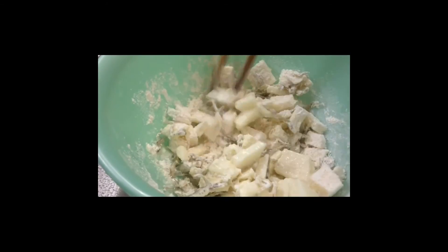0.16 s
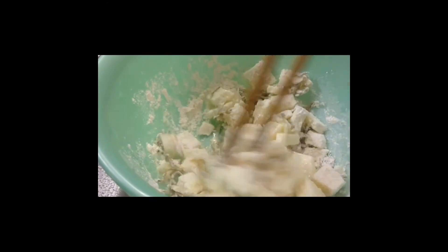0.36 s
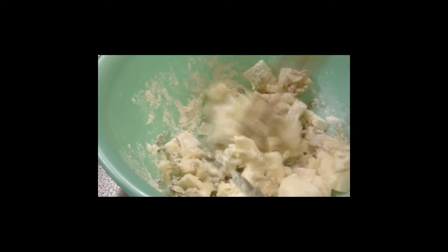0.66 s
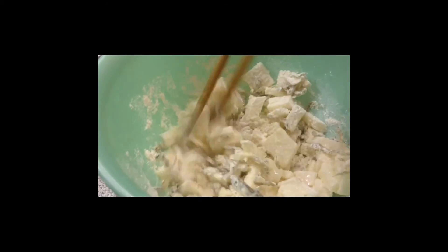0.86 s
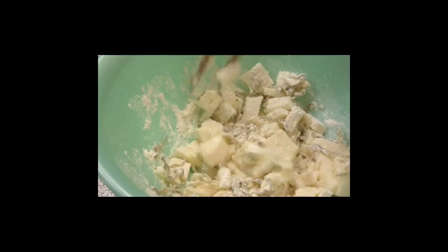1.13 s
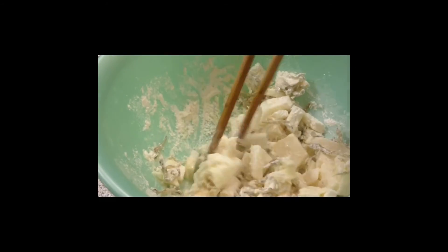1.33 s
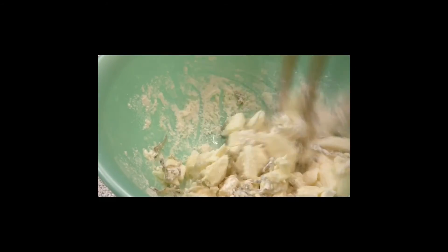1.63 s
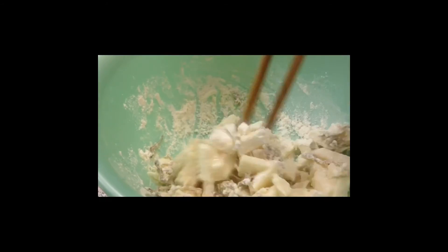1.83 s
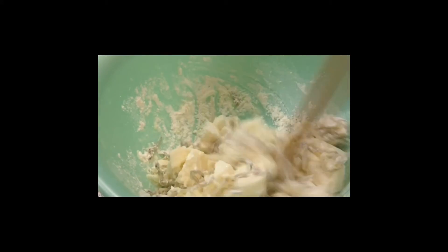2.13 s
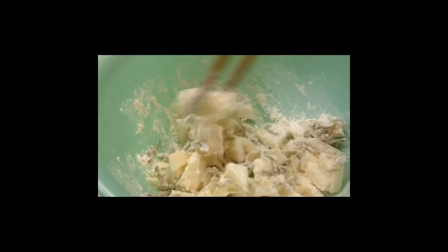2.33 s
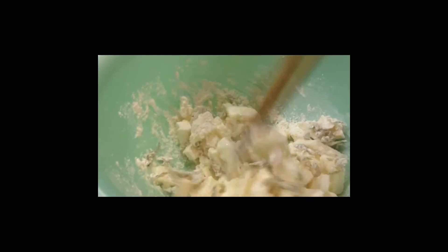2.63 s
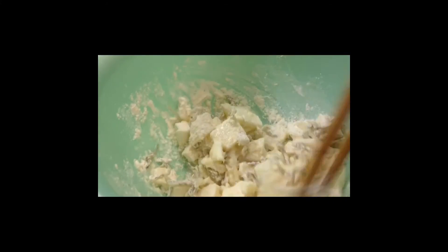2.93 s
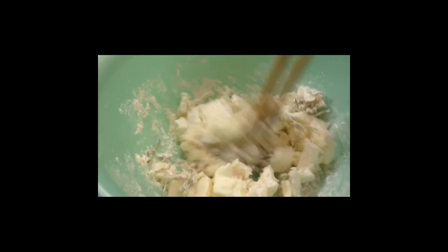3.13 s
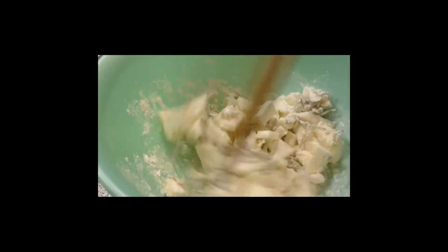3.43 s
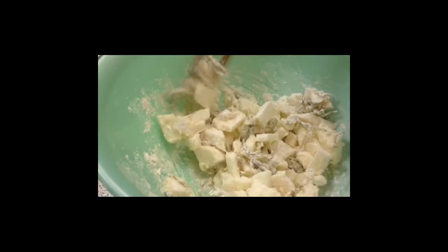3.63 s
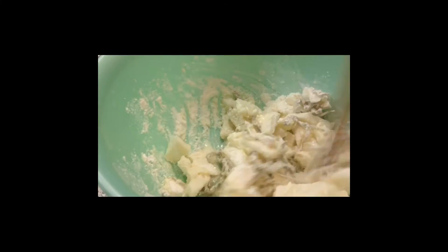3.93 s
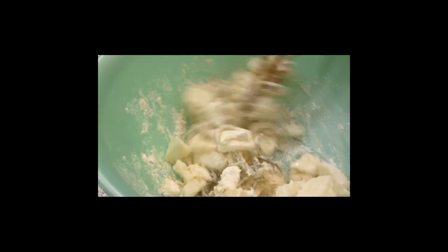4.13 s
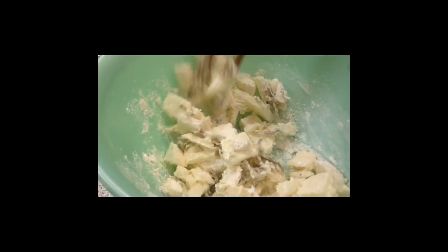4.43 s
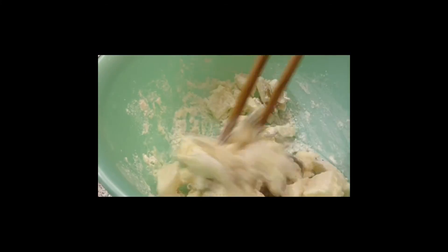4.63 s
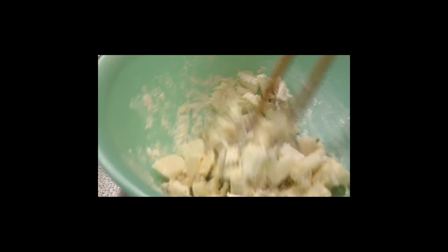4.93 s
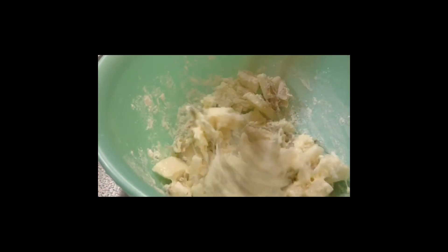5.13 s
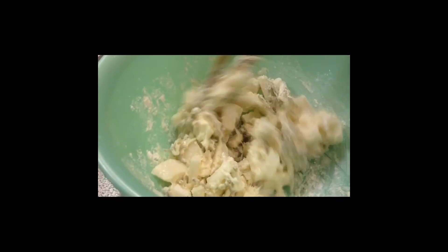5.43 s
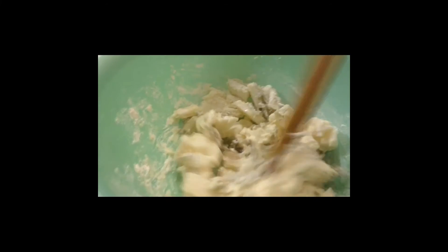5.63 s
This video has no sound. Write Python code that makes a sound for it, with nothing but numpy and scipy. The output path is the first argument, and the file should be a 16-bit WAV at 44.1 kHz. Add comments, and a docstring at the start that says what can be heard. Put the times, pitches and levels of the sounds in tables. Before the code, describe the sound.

In a quiet kitchen, a lumpy, floury mix is stirred briskly and unevenly for about six seconds, heard from close by. Each stroke drags along the plastic bowl with a brief scrape and a fine dry hiss. The wooden chopsticks tick against each other, once sharply past the middle, while sticks and tumbling lumps thud softly on the bowl. A faint low room hum lies underneath.

```python
"""Chopsticks stirring stiff batter

Two wooden chopsticks toss floury chunks in a plastic bowl, close by in a quiet kitchen.
Each stroke drags the gritty mix along the wall, and stick-slip friction makes it scrape.
Knocking sticks and tumbling lumps excite the bowl's low modes as dull thuds; the sticks
click together and ring in their bending modes. Short echoes and a steady hush surround them."""
import sys
import numpy as np
from scipy import signal
from scipy.fft import rfft, irfft, next_fast_len
from scipy.io import wavfile
from scipy.ndimage import uniform_filter1d

SR = 44100
rng = np.random.default_rng(int(sys.argv[2]) if len(sys.argv) > 2 else 0)


def transcribe(signal):
    """Save signal, clipped to [-1, 1], as a 16-bit WAV file at the path in sys.argv[1]."""
    frames = np.atleast_2d(signal).T
    limited = np.clip(frames, -1, 1)
    pcm = np.round(limited * 32767).astype(np.int16)
    wavfile.write(sys.argv[1], SR, pcm)


N = 254898


def amp(db):
    """Amplitude ratio of a level: a factor of ten per 20 dB."""
    return 10 ** (np.asarray(db) / 20)


def unit_rms(x):
    """Normalisation to unit mean power."""
    return x / np.sqrt(np.mean(x ** 2) + 1e-20)


def curve_at(points, hz):
    """Interpolation of (f/Hz, value) points on a logarithmic frequency axis."""
    f, value = np.transpose(points)
    return np.interp(np.log(hz + 1), np.log(f + 1), value)


def add(mix, start_s, sound):
    """Superposition of a sound on the mix."""
    part = mix[round(start_s * SR):][:len(sound)]
    part += sound[:len(part)]


def band(x, low_hz, high_hz):
    """Causal band-pass filtering with skirts of 12 dB per octave."""
    edges_hz = [low_hz, min(high_hz, 0.45 * SR)]
    return signal.sosfilt(signal.butter(2, edges_hz, "band", fs=SR, output="sos"), x)


def coloured(x, spectrum):
    """Spectral shaping by a curve of (f/Hz, level/dB), at unit rms."""
    size = next_fast_len(len(x))
    gain = amp(curve_at(spectrum, np.fft.rfftfreq(size, 1 / SR)))
    return unit_rms(irfft(rfft(x, size) * gain, size)[:len(x)])


def room_hush(air_db=-57.5, drone_db=-55.0, whine_db=-72.5):
    """Stationary noise: a broad hush, a low blurred drone and a faint narrow-band whine."""
    # spectra of the hush and the drone: f/Hz, relative level/dB
    air_spectrum = [(25, -42), (60, -29), (110, -7), (160, 3), (260, -10), (450, -3), (750, -11.5),
                    (1200, -12.5), (2200, -19), (4000, -21), (7000, -22.5), (10500, -28.5), (15500, -30)]
    drone_spectrum = [(90, -17.5), (140, -12), (172, 5), (210, -5.0), (255, 1.5), (310, -6.5),
                      (440, -10.5), (600, -15.0), (1200, -78)]
    whine = amp(whine_db) * unit_rms(band(rng.standard_normal(N), low_hz=2130, high_hz=2280))
    air = amp(air_db) * coloured(rng.standard_normal(N), air_spectrum)
    drone = amp(drone_db) * coloured(rng.standard_normal(N), drone_spectrum)
    return air + whine + drone


def stroke_levels(bite_s=0.007, lift_db_per_s=275, settle_db=-11.5, settle_db_per_s=96):
    """Friction envelopes of drag and dry flour in dB: the sticks bite, heap up the mix and lift."""
    # pushes: t/s, duration/s, final level/dB, swell up to it/dB, flour re drag at mid-push/dB
    strokes = [(0.111, 0.11, -45.5, 2, -5.5), (0.322, 0.072, -58.5, 2, -11), (0.421, 0.16, -47.5, 11, -9.5),
               (0.829, 0.032, -41.5, 8.5, -8), (1.133, 0.12, -48, 3, -12), (1.297, 0.014, -55, -8, -6),
               (1.462, 0.22, -42, 12, -10), (2.01, 0.13, -44.5, 6.5, -8.5), (2.398, 0.02, -41.5, 18, -4.5),
               (2.479, 0.03, -51, -1, -10), (2.744, 0.11, -54.5, 3, -8), (2.879, 0.067, -39, 16.5, -10.5),
               (2.983, 0.023, -45.5, 8, -19), (3.264, 0.13, -52, -2.5, -10),
               (3.591, 0.054, -42, 14.5, -9.5), (3.716, 0.13, -58.5, -2.5, -9),
               (3.901, 0.16, -41, 13.5, -8.5), (4.335, 0.071, -39.5, 16, -18), (4.427, 0.03, -49.5, 9, -3),
               (4.525, 0.058, -52, 2.5, -11), (4.718, 0.17, -51, 10, -6.5), (5.101, 0.19, -51.5, 1, -11.5),
               (5.369, 0.059, -40.5, 23, -7.5), (5.479, 0.083, -47, 5.5, -10),
               (5.75, 0.035, -39.5, 11, -10.5)]
    flour_fade_db = 7.5  # dry flour is met first, damp dough deeper in
    drag_power, flour_power = np.full((2, N), 1e-10)
    t = np.arange(SR * 3 // 4) / SR
    for start_s, length_s, level_db, swell_db, flour_db in strokes:
        depth = np.minimum(t / length_s, 1)
        after_s = np.maximum(t - length_s, 0)
        settling = amp(settle_db - settle_db_per_s * after_s)  # loose lumps keep sliding
        release = (amp(-lift_db_per_s * after_s) + settling) / (1 + amp(settle_db))
        push = np.minimum(t / bite_s, 1) * amp(level_db - swell_db * (1 - depth)) * release
        flour = push * amp(flour_db - flour_fade_db * (depth - 0.5))
        add(drag_power, start_s, push ** 2)
        add(flour_power, start_s, flour ** 2)
    return 10 * np.log10(drag_power), 10 * np.log10(flour_power)


def wander(hz):
    """Random modulation at unit rms, interpolated between hz new values a second."""
    steps = rng.standard_normal(N // 20)
    return unit_rms(np.interp(np.arange(N) * hz / SR, np.arange(len(steps)), steps))


def slips(per_s, spread_db):
    """Shot noise: tiny slips at random moments, most small and a few large."""
    size = amp(spread_db * np.minimum(rng.exponential(1, N), 4))
    return unit_rms(size * rng.standard_normal(N) * (rng.random(N) < per_s / SR))


def patchy(x, depth_db):
    """Spectral modulation: lumps of many sizes pass, each briefly favouring its own frequencies."""
    spectra = signal.stft(x, nperseg=256)[2]
    patches = uniform_filter1d(rng.standard_normal(spectra.shape), size=7, axis=0)
    patches = unit_rms(uniform_filter1d(patches, size=6, axis=1))
    return unit_rms(signal.istft(spectra * amp(depth_db * patches), nperseg=256)[1][:len(x)])


def bowl_ring(detune=0.024, spread_db=1.5):
    """Modal impulse response of the bowl; contact point and batter load shift the modes."""
    # bowl modes: f/Hz, level/dB, T60/s
    modes = [(114.7, -10.5, 0.3), (155.4, -2, 0.138), (176.2, 3, 0.083), (253.4, 1.5, 0.12),
             (331, -5, 0.077), (433.4, -8.5, 0.11), (509, -4.5, 0.036), (680, 0, 0.03), (789, -15, 0.1),
             (847, 1, 0.02), (930, -11.5, .03), (1172, -1, 0.015), (1450, -10, 0.041), (1580, 5, 0.023),
             (1970, -27, 0.026), (2090, 12.5, 0.0082), (2570, -1.5, 0.096)]
    hz, db, t60 = np.transpose(modes)[:, :, None]
    shift, weight = rng.standard_normal((2, len(modes), 1))
    t = np.arange(SR // 4) / SR
    decay = amp(db + spread_db * weight - 60 * t / t60)
    return (decay * np.cos(2 * np.pi * hz * (1 + detune * shift) * t)).sum(0)


def batter_scrape(body_db=0.87, grit_db=-0.5, snaps_db=-14.0, crumbs_db=-58.5, rumble_db=-22.5):
    """Stick-slip friction: floury lumps slide on plastic and drive the bowl's modes into a rumble."""
    # spectra of sliding lumps, dry flour and crumbs: f/Hz, relative level/dB
    lump_spectrum = [(300, -13), (700, -4), (1150, -12), (1600, -1.5), (1900, -6), (2450, 1), (3200, -1),
                     (4200, 1), (5200, -3.5), (7200, -2.5), (9000, -11.5), (10500, -31), (15500, -19)]
    flour_spectrum = [(3000, -45), (6000, -9), (8500, 17.5), (11000, 13), (14000, 12.5), (16000, 0)]
    crumb_spectrum = [(1500, -14), (3500, 0), (7000, 12.5), (10000, 2), (15000, 4)]
    catching_db = 1.5 * wander(hz=110.7) + 0.5 * wander(hz=35.15)  # the mix catches and lets go
    drag_db, flour_db = np.array(stroke_levels()) + catching_db
    coarse, fine = slips(per_s=11000, spread_db=2), slips(per_s=11000, spread_db=1.5)
    sparse, heavy = slips(per_s=60, spread_db=3), slips(per_s=2500, spread_db=1.5)
    body = amp(drag_db + body_db) * patchy(coloured(coarse, lump_spectrum), depth_db=2)
    grit = amp(flour_db + grit_db) * patchy(coloured(fine, flour_spectrum), depth_db=4.5)
    # crumbs keep dropping and unsticking even between the strokes
    crumbs = amp(0.14 * drag_db + crumbs_db) * patchy(coloured(sparse, crumb_spectrum), depth_db=7)
    wall_force = band(heavy, low_hz=135, high_hz=1490)
    rumble = amp(0.65 * drag_db + rumble_db) * unit_rms(signal.oaconvolve(wall_force, bowl_ring())[:N])
    breaks = slips(per_s=150, spread_db=3.5)  # lumps break and bump
    snaps = amp(drag_db + snaps_db) * patchy(coloured(breaks, lump_spectrum), depth_db=6)
    return body + grit + snaps + crumbs + rumble


def bowl_knocks(judder=2.67, slips_per_s=2000):
    """Impact excitation of the bowl: one blow, then a judder as sticks and lumps skid to rest."""
    # heavy blows reach low, hard ones high: t/s, level/dB, low f/Hz, high f/Hz, judder decay time/s
    blows = [(0.112, -42, 145, 1400, 0.097), (0.152, -44, 131, 400, 0.026), (0.4560, -46.5, 130, 487, 0.05),
             (0.524, -46, 140, 710, 0.079), (0.8520, -34, 184, 620, 0.014), (0.866, -34, 170, 810, 0.037),
             (1.1301, -43.5, 292, 1180, 0.0048), (1.25, -48, 140, 400, 0.0033),
             (1.4702, -34, 160, 1370, 0.0043), (1.5060, -47.5, 139, 278, 0.053),
             (1.9880, -38, 1120, 1830, 0.014), (2.006, -38.5, 517, 1700, 0.0055),
             (2.1200, -47.5, 570, 960, 0.014), (2.4230, -42.5, 250, 1460, 0.032),
             (2.4420, -39.5, 208, 860, 0.011), (3.264, -42, 195, 990, 0.091),
             (3.289, -40, 266, 890, 0.0081), (3.3055, -34, 303, 960, 0.012), (3.4438, -50, 148, 307, 0.034),
             (3.5990, -47, 420, 1010, 0.015), (3.628, -41, 144, 650, 0.032),
             (3.895, -48.5, 396, 1790, 0.0074), (4.0121, -41, 260, 1460, 0.036),
             (4.3290, -36.5, 150, 1190, 0.0061), (4.399, -38.5, 290, 796, 0.065),
             (4.5562, -28.5, 117, 470, 0.0072), (4.563, -34, 316, 1100, 0.051),
             (4.593, -33.5, 124, 546, 0.015), (5.1140, -36, 222, 1140, 0.016),
             (5.4325, -34, 229, 980, 0.016), (5.754, -43, 168, 1600, 0.026)]
    out, t = np.zeros(N), np.arange(SR // 4) / SR
    for start_s, level_db, low_hz, high_hz, judder_s in blows:
        skid = rng.standard_normal(len(t)) * (rng.random(len(t)) < slips_per_s / SR)
        skid *= np.exp(-t / judder_s)
        force = judder * np.sqrt(judder_s / 0.048) * skid / (np.linalg.norm(skid) + 1e-9)
        force[0] += 1  # the blow itself
        knock = signal.fftconvolve(band(force, low_hz, high_hz), bowl_ring())[:len(t)]
        add(out, start_s, amp(level_db) * knock / knock[:SR // 32].std())
    return out


def stick_clicks(chatter=0.93, chatter_s=0.0021):
    """Damped bending vibration: where and how hard a stick is struck selects the modes that sound."""
    # wood on wood: t/s, peak level/dB, band centre f/Hz, band half-width/octaves, base T60/s
    contacts = [(0.1548, -31, 2510, 0.45, 0.02), (0.4548, -32.5, 3880, 1.5, 0.02),
                (0.5376, -26, 3450, 0.66, 0.0063), (0.5483, -27.5, 2150, 0.5, 0.0081),
                (0.6494, -37.5, 2420, 1.2, 0.0026), (0.8415, -26, 3700, 0.89, 0.0075),
                (0.8485, -23.5, 3500, 0.92, 0.0036), (1.0292, -41.5, 5500, 0.91, 0.006),
                (1.1265, -25, 2530, 0.48, 0.014), (1.4688, -21, 2760, 1, 0.014),
                (1.969, -25, 3700, 0.85, 0.0073), (2.4068, -37, 3400, 0.28, 0.0083),
                (2.622, -37.5, 4440, 0.21, 0.015), (3.2613, -23.5, 3040, 0.75, 0.0074),
                (3.3051, -24, 1700, 1.1, 0.0056), (3.3844, -35, 2140, 0.41, 0.014),
                (3.5783, -30.5, 2200, 0.2, 0.014), (3.7853, -35.5, 2170, 0.42, 0.011),
                (3.8928, -23, 2630, 0.71, 0.006), (4.2748, -35.5, 8200, 0.31, 0.0041),
                (4.3274, -14.5, 4230, 0.88, 0.0058), (4.3497, -7.5, 4850, 0.75, 0.015),
                (4.532, -36, 5000, 0.6, 0.0073), (4.7178, -39, 4140, 0.41, 0.0058),
                (4.7921, -33.5, 4670, 1.6, 0.0069), (5.115, -27.5, 2560, 0.41, 0.01),
                (5.3397, -36, 6000, 0.64, 0.012), (5.436, -23, 3620, 0.92, 0.017),
                (5.5757, -28.5, 4000, 0.42, 0.0032)]
    # bending modes: f/Hz, level/dB, factor on the base T60
    modes = [(880, -8, 1.5), (1605, -4, 1.6), (2373, 1, 0.9), (2770, 5.5, 0.27), (4020, -2, 0.54),
             (4770, -6.5, 1.07), (5680, -2, 0.39), (6650, -4, 0.48), (8470, -5.5, 0.32),
             (10800, -4.5, 0.16), (13500, -1, 0.19)]
    out, t = np.zeros(N), np.arange(SR // 16) / SR
    hz, db, t60_factor = np.transpose(modes)[:, :, None]
    sign = (-1) ** np.arange(len(modes))[:, None]  # neighbouring modes swing the tip opposite ways
    for start_s, peak_db, centre_hz, octaves, t60 in contacts:
        grip_detune = 1 + 0.025 * rng.standard_normal(hz.shape)
        decay = amp(db - 60 * t / (t60 * t60_factor))
        ring = (sign * decay * np.sin(2 * np.pi * hz * grip_detune * t)).sum(0)
        click = band(ring, centre_hz / 2 ** octaves, centre_hz * 2 ** octaves)
        buzz = rng.standard_normal(len(t)) * np.exp(-t / chatter_s)  # the wood chatters as it parts
        click += chatter * signal.fftconvolve(click, buzz / np.linalg.norm(buzz))[:len(t)]
        add(out, start_s, amp(peak_db) * click / abs(click).max())
    return out


def kitchen_echoes(x, early_db=-6.0, late_db=-7.0, early_s=0.025):
    """Reverberation: early reflections from bowl and worktop, then the room's diffuse tail."""
    # spectrum of the reflections: f/Hz, relative level/dB
    colour = [(100, -41), (250, 7), (600, -6), (1200, 0), (3000, -0.5), (7000, -5), (14000, 8)]
    # reverberation time: f/Hz, T60/s
    room_t60 = [(150, 0.31), (500, 0.26), (3000, 0.48), (8000, 0.11), (15000, 0.5)]
    t = np.arange(SR // 2) / SR
    early = coloured(rng.standard_normal(len(t)), colour) * np.exp(-t / early_s) * (t > 0.0015)
    hz, frame_s, spectra = signal.stft(rng.standard_normal(len(t)), SR, nperseg=256)
    spectra *= amp(curve_at(colour, hz)[:, None] - 60 * frame_s / curve_at(room_t60, hz)[:, None])
    late = signal.istft(spectra, SR, nperseg=256)[1][:len(t)] * np.minimum(t / 0.007, 1)
    echo = amp(early_db) * early / np.linalg.norm(early) + amp(late_db) * late / np.linalg.norm(late)
    return x + signal.fftconvolve(x, echo)[:N]


def scene():
    """Superposition of the stirring, its echoes and the room noise in one channel."""
    stirring = batter_scrape() + stick_clicks() + bowl_knocks()
    return (kitchen_echoes(stirring) + room_hush())[None]


def record(dry, low_cut_hz=80, high_cut_hz=15750):
    """Band limiting: a small microphone sheds the deep bass, and a steep low-pass the top treble."""
    thin = signal.sosfilt(signal.butter(2, low_cut_hz, "high", fs=SR, output="sos"), dry)
    low_pass = signal.firwin(511, high_cut_hz, window=("kaiser", 9), fs=SR)
    return signal.oaconvolve(thin, low_pass[None], "same")


dry = scene()
out = record(dry)
transcribe(out)
```